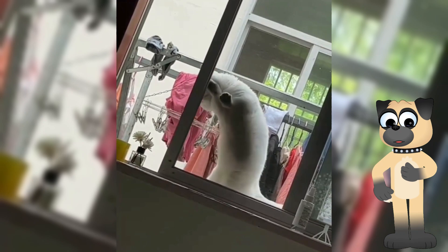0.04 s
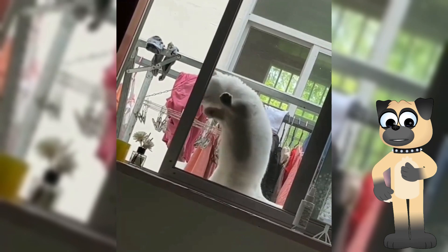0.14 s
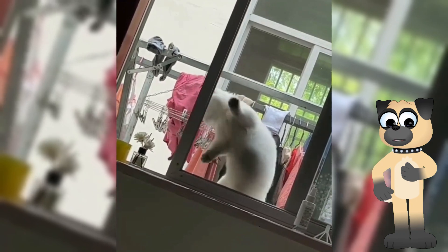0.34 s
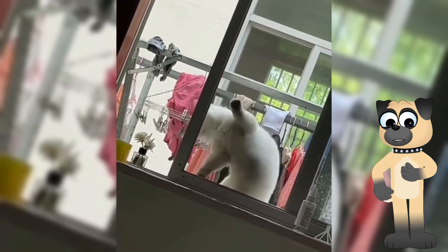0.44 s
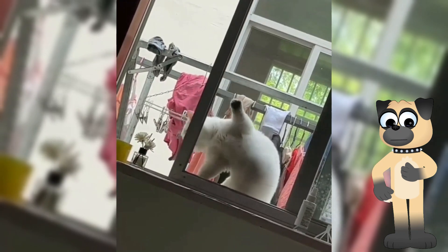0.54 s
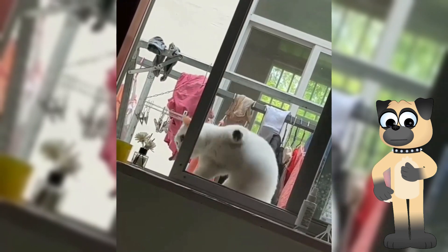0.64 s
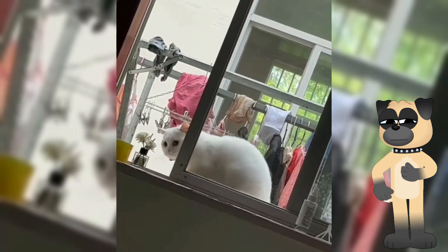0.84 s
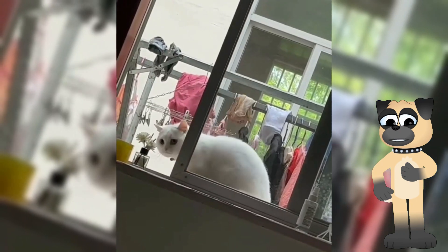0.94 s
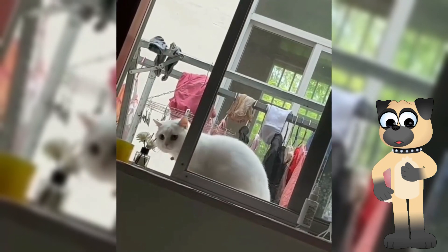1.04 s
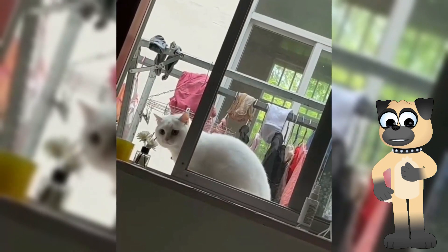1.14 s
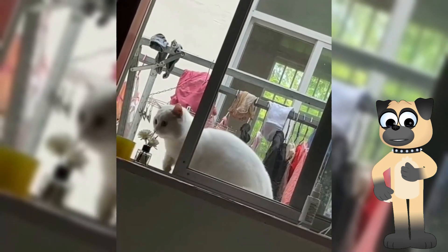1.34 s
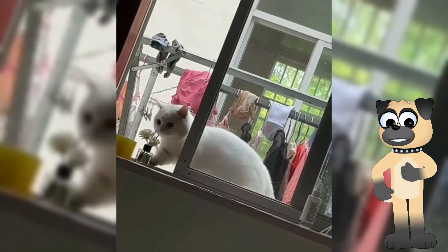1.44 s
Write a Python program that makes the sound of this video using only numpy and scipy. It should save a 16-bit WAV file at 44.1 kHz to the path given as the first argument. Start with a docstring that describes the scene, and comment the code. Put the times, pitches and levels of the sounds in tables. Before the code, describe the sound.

A sliding glass window slams in its frame. A soft track scrape peaks at 0.1 s, then at 0.21 s four rapid contacts make a loud, rattling bang, bass swelling just after the crack. A low beating hum rings through the room. It scrapes again around 0.45 s, bangs lighter at 0.69 s, then fades, with faint ticks near 1.0 and 1.3 s over quiet room tone.

```python
"""A sliding glass window rolls along its track and slams into the frame: a rattle of four contacts.
It slides again and bangs once more, lighter. Bangs are noise shaped by frame resonances and banded envelopes,
the bass building up later than the treble; slides are the same kind of noise, coloured by the track.
After each bang low modes of pane and room swell, beat and fade as decaying sines.
Two faint noise ticks follow. Quiet room tone runs throughout."""
import sys
import numpy as np
from scipy.fft import rfft, irfft, next_fast_len
from scipy.io import wavfile
from scipy.ndimage import map_coordinates

SR = 44100
rng = np.random.default_rng(int(sys.argv[2]) if len(sys.argv) > 2 else 0)


def put_to_file(sound):
    """Save the sound as 16-bit audio at rate SR, in the file named by the first command-line argument."""
    columns = np.atleast_2d(sound).T  # one column per channel
    safe = np.clip(columns, -1, 1)
    whole_steps = np.round(safe * 32767)
    wavfile.write(sys.argv[1], SR, whole_steps.astype(np.int16))


N = 66150  # samples, 1.5 s


def amp(db):
    """Decibels to gain."""
    return 10 ** (np.asarray(db) / 20)


def unit(x):
    """Scale to rms 1."""
    return x / np.sqrt(np.mean(x ** 2) + 1e-20)


def along(points, hz):
    """Interpolate (f/Hz, value) points on a log frequency axis."""
    f, v = np.transpose(points)
    return np.interp(np.log(hz + 1), np.log(f + 1), v)


def since(start_s):
    """Seconds since a moment, zero before it."""
    return np.maximum(np.arange(N) / SR - start_s, 0)


def wobble(knots_per_s):
    """Smooth random curve through normally distributed knots."""
    knots = rng.standard_normal(1024)
    return map_coordinates(knots, [np.arange(N) * knots_per_s / SR], mode="wrap")


def filtered(x, response):
    """Multiply the spectrum of x by a response of frequency."""
    m = next_fast_len(N + 8192)  # zero-padded against wrap-around
    hz = np.fft.rfftfreq(m, 1 / SR)
    return irfft(rfft(x, m) * response(hz), m)[..., :N]


# stereo width: f/Hz, side under mid/dB
WIDTH_DB = [(3900, -70), (4600, -7), (8000, -7), (12000, -4)]


def noise(colour, resonances=()):
    """Stereo noise of rms 1: colour plus resonant peaks or dips in dB; only the treble is wide."""
    def gains(hz):
        level_db = along(colour, hz)
        for centre_hz, width_hz, lift_db in resonances:
            level_db = level_db + lift_db / (1 + (2 * (hz - centre_hz) / width_hz) ** 2)
        mid_side = np.array([np.ones_like(hz), amp(along(WIDTH_DB, hz))])
        return amp(level_db) * mid_side

    mid, side = filtered(rng.standard_normal((2, N)), gains)
    return unit(np.array([mid + side, mid - side]))


def ring(t, build_s, t60_s, steep):
    """Envelope: swells over the build-up time, then decays exponentially."""
    swell = 1 - np.exp(-(t / build_s) ** steep)
    return swell * amp(-60 * np.maximum(t - build_s, 0) / t60_s)


# build-up of the frame's ring, before the bang's slowness factor: f/Hz, time/s
BUILD_S = [(80, 0.11), (200, .05), (450, 0.025), (900, 0.031), (1600, 0.0053), (4000, 0.0032),
           (10000, 0.0024)]
# decay of the frame: f/Hz, t60/s
FRAME_T60_S = [(100, 0.47), (500, 0.53), (1000, 0.44), (2000, 0.13), (4000, 0.32), (10000, 0.39)]
# decay of the room: f/Hz, t60/s
ROOM_T60_S = [(100, 1.88), (400, 1.44), (1000, 1.36), (2500, 0.76), (5000, 0.78), (10000, 0.43)]
# room relative to the frame's ring, before the bang's room offset: f/Hz, level/dB
ROOM_LEVEL_DB = [(100, 6), (500, -9), (2000, -11.5), (5000, -12.5), (10000, -8.5)]
# sharp edge of each contact relative to the ring: f/Hz, level/dB
CRACK_LEVEL_DB = [(80, -20), (200, -1), (450, -25), (900, -4), (2000, -2.5), (10000, -0.5)]
CRACK_BUILD_S, CRACK_T60_S = 0.0024, 0.039
ROOM_DELAY_S = 0.041  # added to the frame's build-up
RATTLE_DB, RATTLE_PER_S = 1.55, 260  # chatter of the loose pane: depth, knot rate
STEP = 16  # samples per envelope point
BANDS, BANDS_PER_OCTAVE, LOWEST_HZ = 13, 1.5, 50


def bang(contacts, colour, resonances, room_db, slowness):
    """Contacts crack and ring the frame's dense modes, treble first; the room holds each band longer."""
    spectrum = rfft(noise(colour, resonances))
    chatter = amp(RATTLE_DB * wobble(RATTLE_PER_S))[::STEP]
    bin_hz = np.fft.rfftfreq(N, 1 / SR)
    octave = np.log2(np.clip(bin_hz, LOWEST_HZ, 12800) / LOWEST_HZ)
    out = np.zeros((2, N))
    for k in range(BANDS):
        hz = LOWEST_HZ * 2 ** (k / BANDS_PER_OCTAVE)
        share = np.maximum(1 - abs(BANDS_PER_OCTAVE * octave - k), 0)  # triangular crossfade
        build_s = slowness * along(BUILD_S, hz)
        crack_gain = amp(along(CRACK_LEVEL_DB, hz))
        room_gain = amp(room_db + along(ROOM_LEVEL_DB, hz))
        power = 0
        for start_s, db in contacts:
            t = since(start_s)[::STEP]
            crack = crack_gain * ring(t, CRACK_BUILD_S, CRACK_T60_S, steep=1.4)
            frame = chatter * ring(t, build_s, along(FRAME_T60_S, hz), steep=2.3)
            room = room_gain * ring(t, build_s + ROOM_DELAY_S, along(ROOM_T60_S, hz), steep=2.0)
            power = power + amp(db) ** 2 * ((crack + frame) ** 2 + room ** 2)
        envelope = np.repeat(np.sqrt(power), STEP)[:N]
        out += irfft(spectrum * share, N) * envelope
    return out


# frame resonances: f/Hz, width/Hz, lift in the slam/dB, lift in the lighter bang/dB
FRAME_MODES = [(575, 15, 7, -5), (622, 9.3, 3.5, -16), (713, 11, -2, 8.5), (756, 25, 5, 2), (979, 17, 4, 7),
               (1129, 10.6, 10.5, -13), (1380, 31, -4.5, 9.5), (1477, 34, 9, 1), (1516, 33, 5.5, 6),
               (1965, 15, 9, 6.5), (2461, 24, 11, 8), (2730, 49, 4.5, 8.5), (2965, 130, -2.5, 7),
               (3620, 92, 3.5, 6.5), (3830, 29, 8.5, 3), (4890, 26, 9.5, -1), (5120, 55, -2, 6),
               (6850, 550, 4, 4)]
# sash contacts in the slam: t/s, level/dB
SLAM_CONTACTS = [(.2108, -11), (.2225, -11), (.231, -14.5), (.2405, -15)]
# slam spectrum: f/Hz, density/dB per Hz
SLAM_SPECTRUM = [(35, -23), (80, -10), (140, -6.5), (230, -3), (400, 2.5), (650, -2.5), (1100, 1),
                 (1500, -2), (2600, -0.5), (4600, -8), (6000, -12.5), (10500, -22.5), (12000, -37.5),
                 (14000, -32)]


def slam():
    """The sash hits the frame hard, in four contacts."""
    resonances = [(hz, width, lift) for hz, width, lift, _ in FRAME_MODES]
    return bang(SLAM_CONTACTS, SLAM_SPECTRUM, resonances, room_db=1.27, slowness=0.93)


# sash contacts in the lighter bang: t/s, level/dB
REBANG_CONTACTS = [(.684, -24), (.690, -19), (.696, -21.5), (.704, -21.5), (.718, -30.5)]
# lighter bang's spectrum: f/Hz, density/dB per Hz
REBANG_SPECTRUM = [(40, -23), (90, -0.5), (200, -2.5), (350, 5.5), (750, -2.5), (1400, 2), (2000, 3),
                   (3000, 1), (4400, -4), (7000, -5), (10700, -13.5), (12500, -27.5), (14000, -52)]


def rebang():
    """A lighter bang of five contacts: quicker build-up, less room."""
    resonances = [(hz, width, lift) for hz, width, _, lift in FRAME_MODES]
    return bang(REBANG_CONTACTS, REBANG_SPECTRUM, resonances, room_db=-4, slowness=0.71)


# low modes of pane and room:
# f/Hz, level in the slam/dB, level in the lighter bang/dB, t60/s, build-up/s, beat/Hz, beat depth/0-1
LOW_MODES = [(41.8, -38, -60, 9, 0.074, 3, 0), (79.7, -15.5, -32.5, 1.2, 0.091, 8.75, 0.36),
             (101.3, -24.5, -42, 2.14, 0.06, 3.69, 0.88), (170.4, -13, -36.5, 2, 0.1, 7.12, 0.27),
             (200, -16.5, -32.5, 1.11, 0.057, 7.9, 0.11), (258.6, -18.5, -39.5, 1.84, 0.091, 7.59, 0.25),
             (312.8, -20.5, -41.5, 1.59, 0.028, 3.2, 0.18), (406.7, -18, -46, 0.83, 0.039, 9.9, 0.4),
             (434.4, -27.5, -40, 1, 0.042, 5.1, 0.14), (475.2, -27, -48, 1.18, 0.022, 4.6, 0.3)]
WAVER, WAVER_PER_S = 0.095, 15.62  # random drift of each mode: depth, knot rate


def hum():
    """Low modes swell after each bang, then waver as they fade; a second partial beats with each."""
    out = 0
    for hz, slam_db, rebang_db, t60_s, build_s, beat_hz, depth in LOW_MODES:
        drift = 1 + WAVER * (wobble(WAVER_PER_S) + 1j * wobble(WAVER_PER_S))
        for start_s, db in (SLAM_CONTACTS[0][0], slam_db), (REBANG_CONTACTS[0][0], rebang_db):
            t = since(start_s)
            beat = depth * np.exp(2j * np.pi * beat_hz * t)
            tone = np.imag((drift + beat) * np.exp(2j * np.pi * hz * t))
            out = out + amp(db) * ring(t, build_s, t60_s, steep=3.1) * tone
    return out


# runs of the sash: t of the fastest point/s, rise/s, fall/s, peak level/dB, tilt/dB per octave
RUNS = [(.102, 0.084, 0.08, -33, -1.5), (0.448, 0.12, 0.053, -30, 2.5), (.65, 0.067, 0.15, -35, -3)]
# scrape spectrum before tilt: f/Hz, density/dB per Hz
TRACK_SPECTRUM = [(30, -15), (75, -2), (130, -9), (400, -12), (750, -11), (1000, -1), (2500, -4.5),
                  (3800, -1), (6000, -7), (10500, -11), (12000, -24.5), (14000, -28)]
SLIDE_FALL_DB = 7  # drop over one rise or fall time
SCRAPE_DB, SCRAPE_PER_S = 1.1, 148.9  # level flutter: depth, knot rate


def slides():
    """The sash scrapes along its track; level in dB rises and falls linearly about each peak."""
    t, out = np.arange(N) / SR, 0
    resonances = [(hz, width, (a + b) / 2) for hz, width, a, b in FRAME_MODES]
    for peak_s, rise_s, fall_s, db, tilt in RUNS:
        colour = [(hz, level + tilt * np.log2(hz)) for hz, level in TRACK_SPECTRUM]
        away = np.maximum((peak_s - t) / rise_s, (t - peak_s) / fall_s)
        level_db = db - SLIDE_FALL_DB * away + SCRAPE_DB * wobble(SCRAPE_PER_S)
        out = out + amp(level_db) * noise(colour, resonances)
    return out


# small settling ticks: t/s, level/dB
SETTLING_TICKS = [(.992, -51), (1.297, -48.5)]
# tick spectrum: f/Hz, density/dB per Hz
TICK_SPECTRUM = [(500, -27.5), (2500, -3), (4300, -9), (5100, 5), (6200, -11), (14000, -15)]
TICK_BUILD_S, TICK_T60_S = 0.001, 0.033


def ticks():
    """Tiny noise bursts as the window settles."""
    envelope = sum(amp(db) * ring(since(start_s), TICK_BUILD_S, TICK_T60_S, steep=2)
                   for start_s, db in SETTLING_TICKS)
    return noise(TICK_SPECTRUM) * envelope


# room tone spectrum: f/Hz, density/dB per Hz
AIR_SPECTRUM = [(20, -12.5), (42, 7.5), (70, 6.5), (150, -2.5), (400, -6.5), (1200, -13), (4000, -21),
                (10000, -31), (14000, -33.5)]
AIR_DB = -48.5  # rms


def room_tone():
    """Steady noise, strongest in the bass."""
    return amp(AIR_DB) * noise(AIR_SPECTRUM)


def scene():
    """Two bangs and their hum, slides and ticks over room tone."""
    return slam() + rebang() + hum() + slides() + ticks() + room_tone()


CEILING, TOP_HZ = 1, 13900  # full scale, band limit


def record(dry):
    """Round off the highest peaks, then cut everything above the band limit."""
    rounded = dry / (1 + np.abs(dry / CEILING) ** 6) ** (1 / 6)
    return filtered(rounded, lambda hz: hz < TOP_HZ)


dry = scene()
out = record(dry)
put_to_file(out)
```